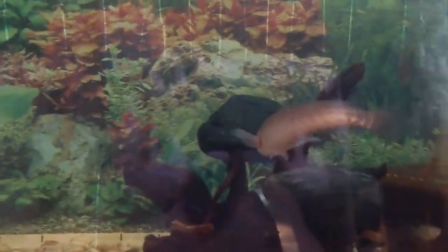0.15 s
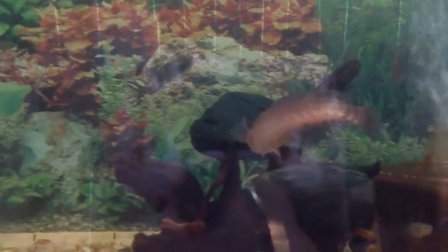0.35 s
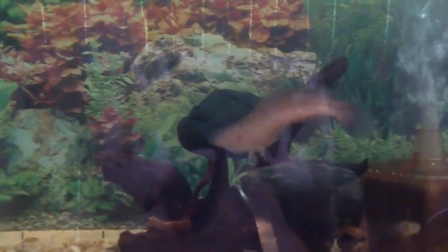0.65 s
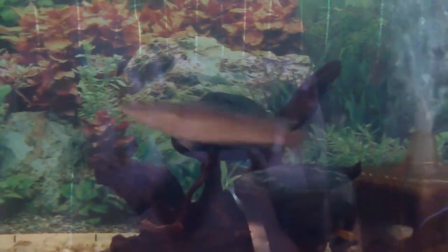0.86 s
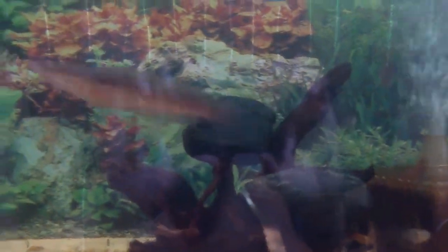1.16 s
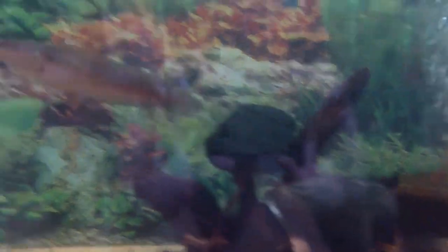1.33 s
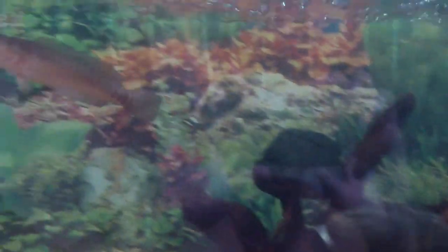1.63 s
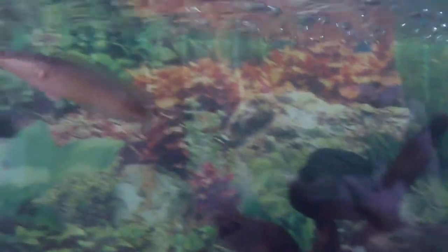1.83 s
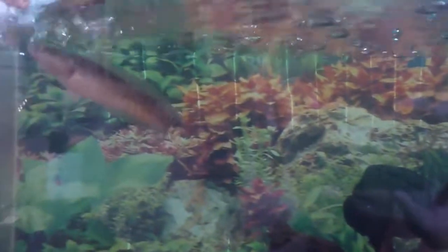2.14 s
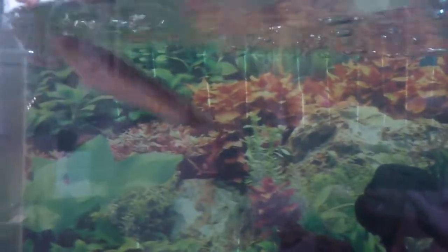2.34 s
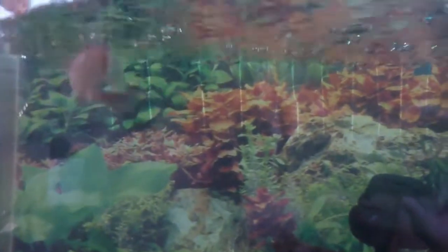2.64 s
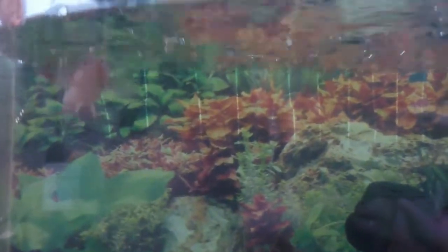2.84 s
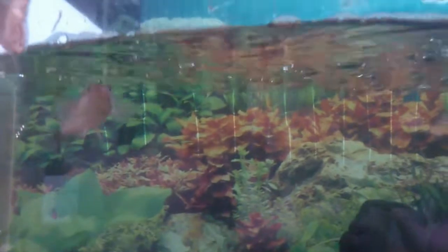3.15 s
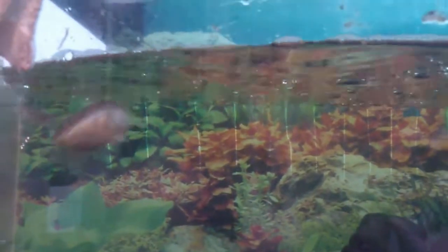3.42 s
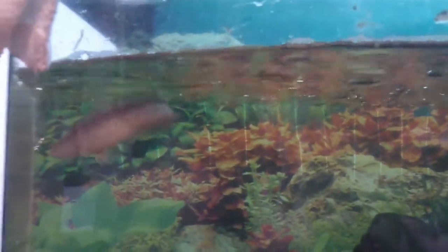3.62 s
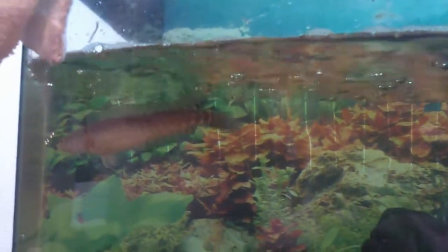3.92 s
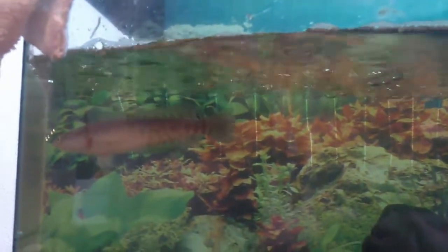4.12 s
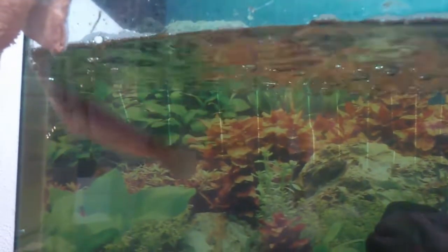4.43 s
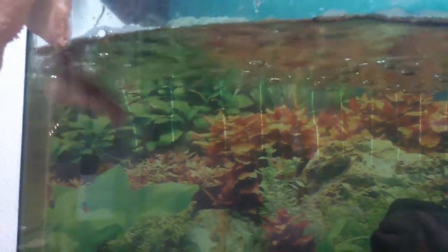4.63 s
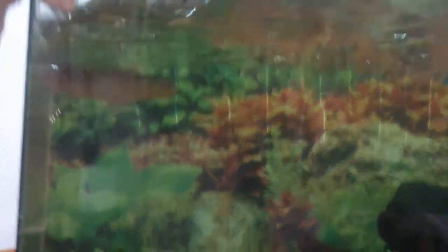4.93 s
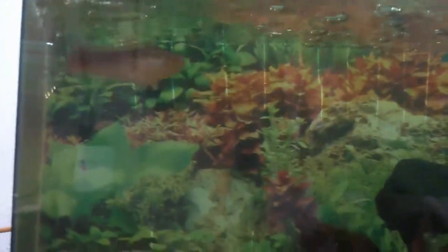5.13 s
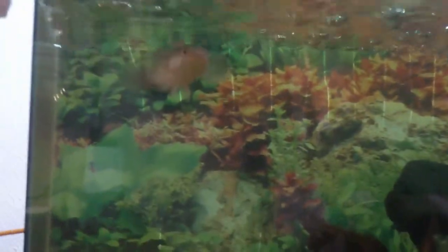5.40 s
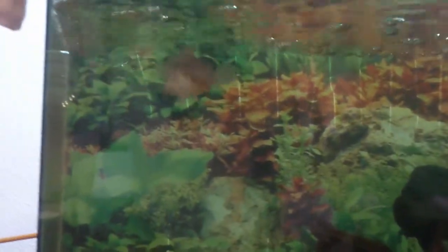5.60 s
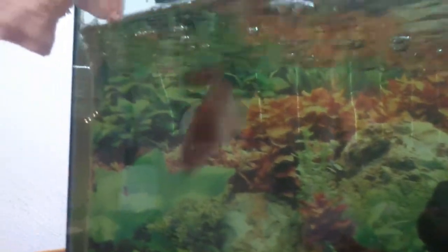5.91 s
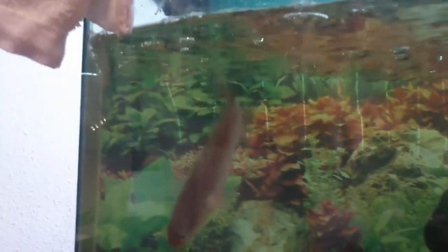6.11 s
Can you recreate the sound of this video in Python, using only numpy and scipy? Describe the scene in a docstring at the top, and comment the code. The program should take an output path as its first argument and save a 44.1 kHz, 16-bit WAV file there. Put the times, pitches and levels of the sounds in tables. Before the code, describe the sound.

A diaphragm air pump hums and buzzes continuously beside a fish tank, its hissy valve flutter strongest on the left. In a quiet room, a small clatter of clicks comes after two seconds, more clicks follow, then a fish breaks the surface with a short splash, hollow knock and tiny droplets. Faint squeaks appear before and around it. A handheld phone moves along the glass.

```python
"""Air pump beside a fish tank

A quiet room, with a hand-held stereo phone that moves along the glass. A diaphragm pump buzzes on the
mains as a stack of sine orders, and each stroke spits noise through its valve, strongest on the left.
Shaped noise makes the room air, clicks, scrape, splashes and case ticks; decaying sines make a knock,
short rising sines the bubbles and droplets, and a shaken tone with its octave the squeaks."""
import sys
import numpy as np
from scipy import signal
from scipy.fft import rfft, irfft
from scipy.io import wavfile
from scipy.ndimage import uniform_filter1d

SR = 44100
rng = np.random.default_rng(int(sys.argv[2]) if len(sys.argv) > 2 else 0)


def to_wav(sig):
    """Store sig (one row per channel, or 1-D mono) as 16-bit WAV at the path in sys.argv[1].

    Samples outside -1..1 are clipped; the rate is SR.
    """
    pcm = np.clip(np.atleast_2d(sig), -1, 1) * 32767
    pcm = np.round(pcm).astype(np.int16)
    wavfile.write(sys.argv[1], SR, pcm.T)  # frames by channels


N = 276066
T = np.arange(N) / SR
MAINS_HZ = 50.052


def undb(db):
    """Amplitude from decibels."""
    return 10 ** (np.asarray(db) / 20)


def unit(x):
    """Scale to an RMS of 1."""
    return x / np.sqrt(np.mean(x ** 2))


def band(x, hz, width_hz):
    """Two-pole resonance, gain 1 at the centre."""
    return signal.lfilter(*signal.iirpeak(hz, hz / width_hz, fs=SR), x)


def walk(rate):
    """Slow chance with spread 1: noise smoothed twice over 1 / rate seconds."""
    k = int(SR / rate)
    smooth = uniform_filter1d(rng.standard_normal(N), k)
    return unit(uniform_filter1d(smooth, k))


def add(out, s, sound):
    """Mix a sound in from s seconds on, cut at the end of the scene."""
    i = int(s * SR)
    out[:, i:i + sound.shape[-1]] += sound[..., :N - i]


# Room air and the phone's own hiss. Each row: frequency in Hz, left level in dB per Hz,
# right level in dB per Hz, likeness of the two sides from 0 to 1.
AIR_SPECTRUM = [(15, -73, -87, .99), (30.7, -74.5, -77.5, .99), (57.2, -64.5, -68.5, 0.99),
                (93.5, -75, -75, 0.92), (162, -78, -77.5, 0.96), (490, -83, -85.5, 1),
                (810, -90, -87, 0.55), (1210, -86.5, -88.5, 0.42), (1750, -96, -90.5, 0),
                (2800, -95.5, -94.5, 0), (6500, -97.5, -99, 0.12), (8840, -95, -99, 0.03),
                (10900, -100, -102, 0), (16500, -109, -109, .02)]


def air():
    """Coloured noise whose two sides are most alike in the bass."""
    hz, left_db, right_db, alike = np.transpose(AIR_SPECTRUM)
    log_f = np.log(np.maximum(np.fft.rfftfreq(N, 1 / SR), 1))
    likeness = np.clip(np.interp(log_f, np.log(hz), alike), 0, 1)
    shares = np.sqrt([(1 + likeness) / 2, (1 - likeness) / 2])
    mid, side = rfft(rng.standard_normal((2, N))) * shares * np.sqrt(SR / 2)
    gains = undb([np.interp(log_f, np.log(hz), db, left=-120) for db in (left_db, right_db)])
    return irfft(gains * np.array([mid + side, mid - side]), N)


# Room modes stirred by far rumble. Each row: frequency in Hz, width in Hz, RMS level in dB
# midway between the two sides.
ROOM_MODES = [(49.6, 2.9, -58.5), (78.6, 2.2, -51.5)]


def boom():
    """Noise ringing in narrow room modes, slightly stronger on the left."""
    rumble = sum(undb(db) * unit(band(rng.standard_normal(N), hz, width_hz))
                 for hz, width_hz, db in ROOM_MODES)
    return rumble * undb([[.6], [-.6]])


WHINE_HZ, WHINE_DB = 13600, -85


def whine():
    """A thin electric whistle: one sine with a wandering phase."""
    return undb(WHINE_DB) * np.sqrt(2) * np.sin(2 * np.pi * WHINE_HZ * T + .5 * walk(30))


ROOM_T60_S, ROOM_DB = .5, -8  # decay time; energy of the tail relative to the dry sound


def room(dry):
    """A diffuse decaying tail, different on each side."""
    t = T[:SR // 2]
    tail = rng.standard_normal((2, len(t))) * undb(-60 * t / ROOM_T60_S) * np.minimum(t / 0.029, 1)
    tail *= undb(ROOM_DB) / np.sqrt(np.sum(tail ** 2, axis=1, keepdims=True))
    return dry + signal.fftconvolve(dry, tail, axes=1)[:, :N]


# Two faint rough squeaks, one list of contour points for each. Each row: time in seconds, pitch in Hz,
# fundamental in dB, octave in dB, the last three before the shake.
SQUEAK_CONTOURS = [
    [(1.09, 1232, -69, -78), (1.3, 1225, -70, -78), (1.4, 1170, -68, -78), (1.72, 1200, -67, -82),
     (1.82, 1164, -72, -85)],
    [(3.96, 1702, -74, -65), (4.06, 1665, -72, -62), (4.2, 1695, -63.5, -60), (4.42, 1681, -65, -66),
     (4.62, 1665, -69, -67), (4.8, 1646, -66, -65.5), (4.86, 1660, -70, -72)],
]
SQUEAK_ATTACK_S, SQUEAK_RELEASE_S = .02, .03


def squeak(contour):
    """Stick-slip tone with its octave, shaken in pitch and level, leaning left."""
    s, *columns = np.transpose(contour)
    hz, low_db, high_db = (np.interp(T, s, column) for column in columns)
    rise, fall = (T - s[0]) / SQUEAK_ATTACK_S, (s[-1] - T) / SQUEAK_RELEASE_S
    gate = np.clip(np.minimum(rise, fall), 0, 1)
    shaken_hz = hz * (1 + .005 * walk(25.9) + .03 * walk(293))
    turn = 2 * np.pi * np.cumsum(shaken_hz) / SR
    shake = np.sqrt(2) * undb(3.1 * walk(38)) * gate
    tone = undb(low_db) * np.sin(turn) + undb(high_db) * np.sin(2 * turn)
    return shake * tone * undb([[1.5], [-1.5]])


def bursts(rows):
    """Grainy contact noise in bands; rows: s, level dB, left minus right dB, Hz, width Hz, t60 s."""
    out, t = np.zeros((2, N)), T[:SR // 3]
    for s, db, pan_db, hz, width_hz, t60 in rows:
        # the grain: a fresh random level every 60 samples
        grain_db = 3.24 * np.repeat(rng.standard_normal(len(t) // 60), 60)
        grit = rng.standard_normal((2, len(t))) * undb(grain_db)
        fade = np.minimum(t / (0.024 * t60), 1) * undb(-60 * t / t60)
        burst = band(band(grit, hz, width_hz), hz, 1.9 * width_hz) * fade
        # give the burst the energy of its envelope
        burst *= np.sqrt(np.sum(fade ** 2) / np.sum(burst ** 2, axis=1, keepdims=True))
        add(out, s, undb(db - 5 + np.array([[pan_db], [-pan_db]]) / 2) * burst)
    return out


# Clicks away from the phone. Each row: start in seconds, level in dB, centre in Hz, decay t60 in seconds,
# opening crack in dB relative to the click.
CLICK_ROWS = [(1.969, -43.5, 8900, 0.116, -12), (2.016, -34.5, 3314, 0.13, -20),
              (2.046, -23, 3470, 0.037, -24), (2.122, -33.5, 2580, 0.041, -20),
              (2.157, -29, 4870, 0.034, -7), (2.544, -45, 4500, .04, -12), (2.745, -50, 12100, .12, -12),
              (3.024, -41, 5260, .046, -8), (3.268, -43, 2600, .04, -15), (3.37, -49, 12800, .04, -12),
              (3.553, -26.5, 7900, .08, -5), (3.567, -32, 8700, .16, -6), (4.785, -40.5, 9100, .03, -12),
              (5.45, -41, 4680, 0.074, -12), (5.615, -50, 14500, .08, -10)]
CLICK_WIDTH, CLICK_PAN_DB = 0.323, 3.5  # width as a share of the centre; left minus right
CRACK_HZ, CRACK_WIDTH_HZ, CRACK_T60_S = 7000, 8000, 0.027


def clicks():
    """Each click is a ringing band of noise that opens with a broad crack."""
    rows = []
    for s, db, hz, t60, crack_db in CLICK_ROWS:
        rows.append((s, db, CLICK_PAN_DB, hz, CLICK_WIDTH * hz, t60))
        rows.append((s, db + crack_db, CLICK_PAN_DB, CRACK_HZ, CRACK_WIDTH_HZ, CRACK_T60_S))
    return bursts(rows)


SCRAPE_FROM_S, SCRAPE_TO_S = 2.055, 2  # the crackles run from the later time to the earlier
SCRAPE_DB, SCRAPE_HZ, CRACKLE_T60_S = -37.5, 3100, 0.01  # level of the strongest; middle pitch


def scrape(count=8):
    """A run of short crackles, random in timing, pitch and strength."""
    rows = []
    for j, (late, pitch, size) in enumerate(rng.random((count, 3))):
        s = SCRAPE_FROM_S + (SCRAPE_TO_S - SCRAPE_FROM_S) * (j + late) / count
        hz = SCRAPE_HZ * 2.1 ** (pitch - .5)
        rows.append((s, SCRAPE_DB - 4 * size, CLICK_PAN_DB, hz, .4 * hz, CRACKLE_T60_S))
    return bursts(rows)


# Splashes. Each row: start in seconds, level in dB, then added to the bands below: lowest band in dB,
# second and third bands in dB, top band in dB.
SPLASH_ROWS = [(4.504, -27, -11.5, -0.5, -7.5), (4.54, -41, -6, 0, -8), (4.567, -40.5, -7, 2, -3),
               (4.755, -34.5, -0.5, -6.5, -18)]
# The five bands of a splash. Each row: centre in Hz, width in Hz, relative level in dB, t60 in seconds.
SPLASH_BANDS = [(700, 650, 0, .06), (1483, 1100, -1, .11), (2700, 1600, -4, .07), (4530, 1450, 0, 0.059),
                (8700, 2600, -0.5, 0.157)]
SPLASH_PAN_DB = 2.5  # left minus right


def splashes():
    """Five bands of noise start together and fade at their own rates."""
    rows = []
    for s, db, low_db, mid_db, top_db in SPLASH_ROWS:
        balance_db = (low_db, mid_db, mid_db, 0, top_db)
        for (hz, width_hz, band_db, t60), extra_db in zip(SPLASH_BANDS, balance_db):
            rows.append((s, db + band_db + extra_db, SPLASH_PAN_DB, hz, width_hz, t60))
    return bursts(rows)


PORT_HZ, PORT_WIDTH_HZ, PORT_DB = 8750, 730, 1.33


def left_port(far):
    """Resonance of the left microphone port, stirred by the far sounds."""
    ring = undb(PORT_DB) * band(far[0], PORT_HZ, PORT_WIDTH_HZ)
    return np.array([ring, 0 * ring])


# Modes of the hollow knock. Each row: frequency in Hz, relative level in dB, decay t60 in seconds.
KNOCK_MODES = [(120, 1, 0.29), (181, 0, 0.093), (272, 5.5, 0.12), (341, 0, 0.116), (1440, -2.5, 0.076),
               (2580, -5, 0.09)]
KNOCK_S, KNOCK_DB = 4.505, -35.5


def knock():
    """A blow on something hollow; the lower the mode, the longer it takes to build up."""
    out, t = np.zeros((2, N)), T[:SR // 2]
    for hz, db, t60 in KNOCK_MODES:
        build = np.minimum(t * hz / 2.2, 1)  # full after 2.2 cycles
        add(out, KNOCK_S, undb(KNOCK_DB + db - 60 * t / t60) * build * np.sin(2 * np.pi * hz * t))
    return out


# Bubbles bursting. Each row: start in seconds, peak in dB, starting pitch in Hz, length in seconds.
BUBBLES = [(.46, -56, 1000, 0.034), (2.522, -51.5, 1670, .016), (5.616, -46.5, 1840, 0.02)]


def plinks(rows):
    """Bubbles whose pitch climbs a little as they burst."""
    out = np.zeros((2, N))
    for s, db, hz, length_s in rows:
        t = T[:int(length_s * SR)]
        swell = np.sqrt(np.sin(np.pi * t / length_s))
        add(out, s, undb(db) * swell * np.sin(2 * np.pi * hz * t * (1 + .3 * t)))
    return out


DROPLETS_FROM_S, DROPLETS_TO_S = 4.5, 5
DROPLET_LOW_HZ, DROPLET_HIGH_HZ, DROPLET_DB = 1100, 4500, -45  # pitch range; highest possible peak


def droplets(count=16):
    """Droplets falling back around the knock: random small plinks that thin out and fade."""
    late, pitch, size = rng.random((count, 3)).T
    s = DROPLETS_FROM_S + (DROPLETS_TO_S - DROPLETS_FROM_S) * late ** 1.6
    hz = DROPLET_LOW_HZ * (DROPLET_HIGH_HZ / DROPLET_LOW_HZ) ** pitch ** 1.5
    db = DROPLET_DB - 8 * late - 6 * size
    return plinks(np.transpose([s, db, hz, 12 / hz]))  # 12 cycles at the starting pitch


# Dry ticks in the phone's own case. Each row: start in seconds, snap level in dB, snap left minus right
# in dB, snap centre in Hz, ring of the case in dB.
CASE_TICKS = [(3.2817, -25, 5, 11500, -29.5), (5.023, -29.5, 5, 8440, -50)]
SNAP_T60_S = 0.0042
CASE_HZ, CASE_WIDTH_HZ, CASE_T60_S = 2070, 710, 0.0105


def ticks():
    """A very short broad snap with the ring of the case, right at the microphones."""
    rows = []
    for s, db, pan_db, hz, ring_db in CASE_TICKS:
        rows.append((s, db, pan_db, hz, 0.9 * hz, SNAP_T60_S))
        rows.append((s, ring_db, 0, CASE_HZ, CASE_WIDTH_HZ, CASE_T60_S))
    return bursts(rows)


# Lower orders of the hum, counted from 1, at the first spot. Each row: left RMS level in dB, right RMS
# level in dB, change at the second spot in dB, which the right side takes by half.
LOW_ORDERS = [(-55, -56, 0), (-44, -45, 0), (-63, -65, 1), (-55, -54, -4), (-52, -53, 1), (-62, -64, 3),
              (-56, -56, 0), (-54, -55, -2), (-65, -58, -3), (-56, -53, -5), (-60, -60, -4), (-61, -62, -3),
              (-60, -60, -3), (-63, -62, 1), (-59, -61, -1), (-62, -64, 3), (-74, -78, 5), (-74, -67, 2),
              (-76, -71, -2), (-70, -73, 1)]
# Outline of the faint orders above. Each row: order, mean level of even orders in dB at the first spot.
UPPER_ORDERS = [(21, -82), (24, -74.5), (29, -77), (33, -71), (36, -71), (40, -77), (50, -79)]
ODD_DB, UPPER_MOVED_DB = -3, -2.5  # odd orders lie lower; the faint orders drop at the second spot
UPPER_SCATTER_DB = 3  # standing waves scatter each faint order by chance


def hum_levels():
    """Level of every order in dB: left and right at the first spot, then at the second."""
    left_db, right_db, change_db = np.transpose(LOW_ORDERS)
    strong = np.transpose([left_db, right_db, left_db + change_db, right_db + change_db / 2])
    k = np.arange(len(LOW_ORDERS) + 1, int(UPPER_ORDERS[-1][0]) + 1)
    mean_db = np.interp(k, *np.transpose(UPPER_ORDERS)) + ODD_DB * (k % 2)
    moved_db = UPPER_MOVED_DB * np.array([0, 0, 1, 1])
    scatter_db = UPPER_SCATTER_DB * rng.standard_normal((len(k), 4))
    return np.vstack([strong, mean_db[:, None] + moved_db + scatter_db])


MOVE_S = (1.13, 2.3)  # the phone shifts from the first spot to the second
SWEEP_S = .0016  # before the blur, each order comes this much before the one below: a downward sweep


def hum():
    """Mains-locked orders; standing waves give each its own level at each spot and side."""
    moved = np.interp(T, MOVE_S, (0, 1))
    out, waver = np.zeros((2, N)), walk(3.3)
    for k, db in enumerate(hum_levels(), start=1):
        first, second = undb(np.reshape(db, (2, 2, 1)))
        side_phase = 0.045 * k * np.array([[0], [1]])  # the sides drift apart in the higher orders
        sweep = np.pi * MAINS_HZ * SWEEP_S * k ** 2  # a lead that grows with order sums to a square law
        sweep += .8 * rng.standard_normal()  # echoes blur the sweep by chance
        tone = np.sin(2 * np.pi * k * MAINS_HZ * T + sweep + side_phase + 0.0022 * k * waver)
        out += np.sqrt(2) * (first + (second - first) * moved) * tone
    return out


# Resonances of the valve air. Each row: centre in Hz, width in Hz, relative level in dB.
VALVE_BANDS = [(2320, 322, -3.5), (3540, 600, 0), (4390, 903, -2), (6230, 1250, -1.5), (7220, 710, -0.5),
               (8587, 1245, -1), (9900, 1900, -8)]
VALVE_DB = -54.5  # RMS on the left
VALVE_RIGHT_DB, VALVE_LAG_S = -19.5, .0004  # right side relative to the left


def valve():
    """A spit of air at each stroke, strong or weak by chance, over a leak; late and faint on the right."""
    turns = T * MAINS_HZ + 0.064
    cycle, phase = turns.astype(int), turns % 1
    size = undb(2.57 * rng.standard_normal((cycle[-1] + 1, len(VALVE_BANDS))))[cycle]
    leak = 0.034
    spit = np.minimum(phase / 0.063, 1) ** 2 * np.exp(-phase / 0.36) + leak
    jet = np.zeros(N)
    for j, (hz, width_hz, db) in enumerate(VALVE_BANDS):
        hiss = band(band(rng.standard_normal(N), hz, width_hz), hz, 2 * width_hz)
        jet += undb(db) * size[:, j] * spit * hiss
    left = unit(jet)
    right = undb(VALVE_RIGHT_DB) * np.roll(left, int(VALVE_LAG_S * SR))
    return undb(VALVE_DB) * np.array([left, right])


def scene():
    """Far sounds ring in the room; the pump, water, knock and case ticks reach the phone dry."""
    far = room(clicks() + scrape() + splashes() + sum(map(squeak, SQUEAK_CONTOURS)))
    background = air() + boom() + whine()
    water = plinks(BUBBLES) + droplets()
    pump = hum() + valve()
    return background + far + left_port(far) + knock() + water + ticks() + pump


TOP_HZ = 15800


def record(dry):
    """The phone cuts the top with a steep low-pass."""
    return signal.sosfilt(signal.ellip(10, .2, 70, TOP_HZ, fs=SR, output="sos"), dry)


dry = scene()
out = record(dry)
to_wav(out)
```